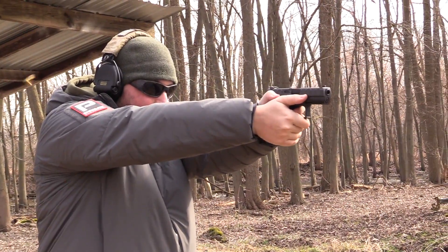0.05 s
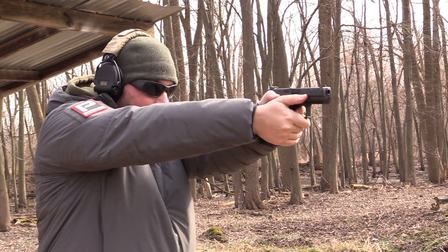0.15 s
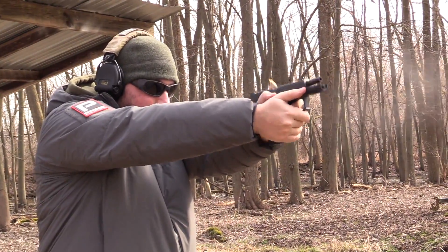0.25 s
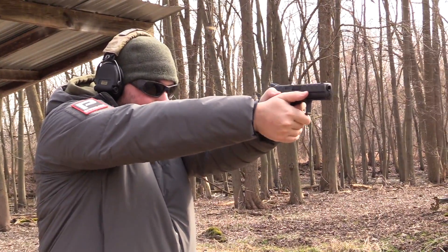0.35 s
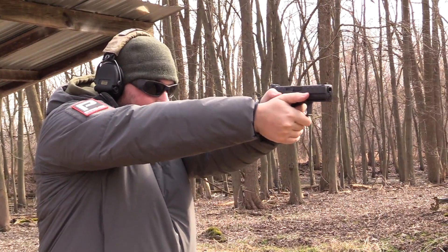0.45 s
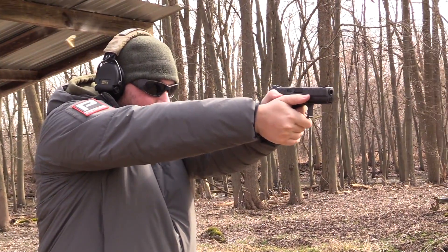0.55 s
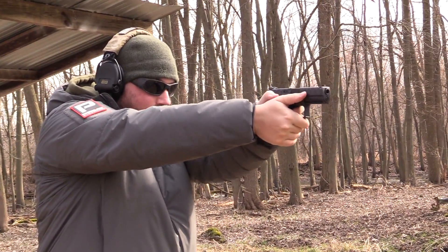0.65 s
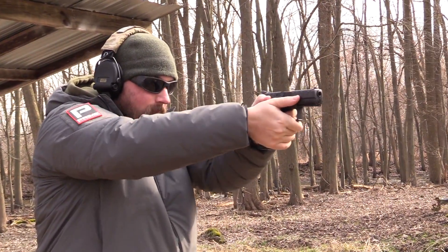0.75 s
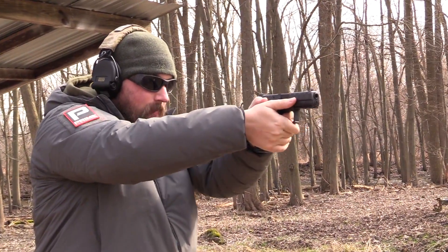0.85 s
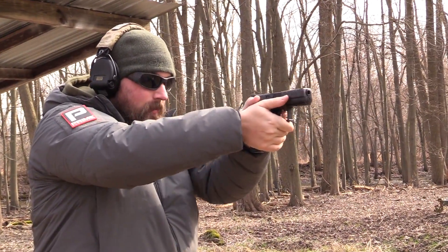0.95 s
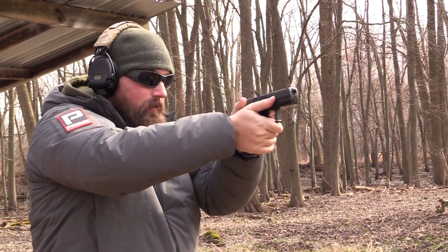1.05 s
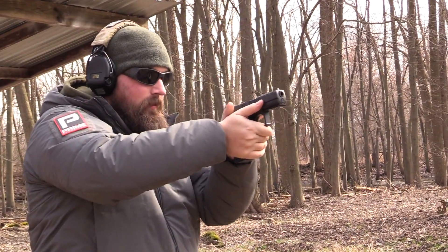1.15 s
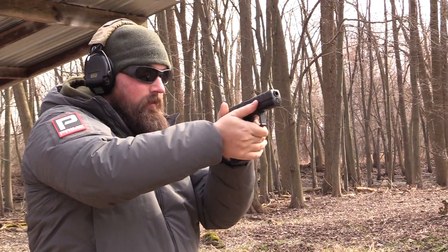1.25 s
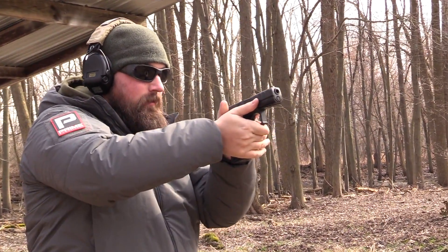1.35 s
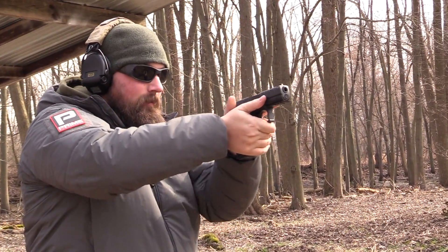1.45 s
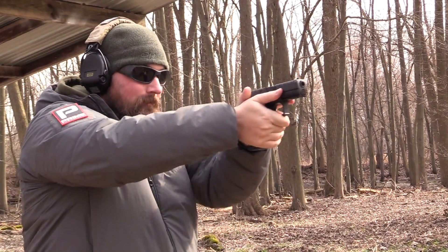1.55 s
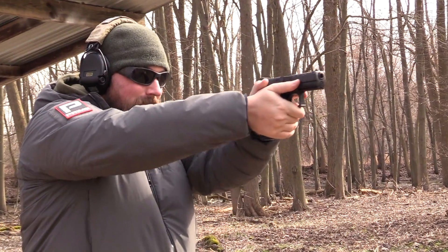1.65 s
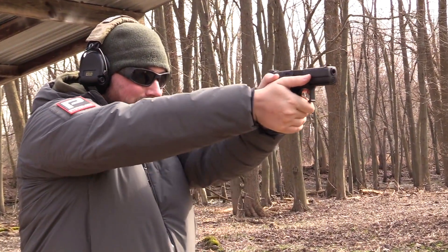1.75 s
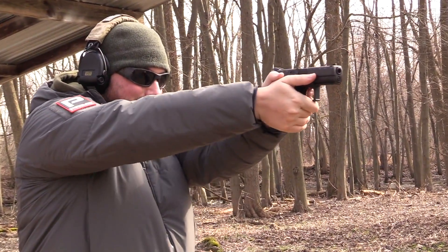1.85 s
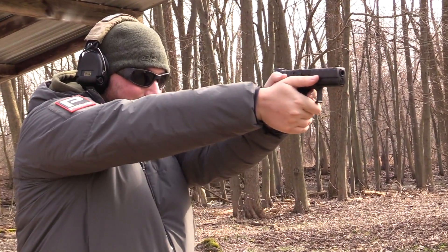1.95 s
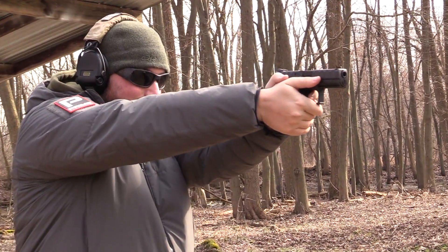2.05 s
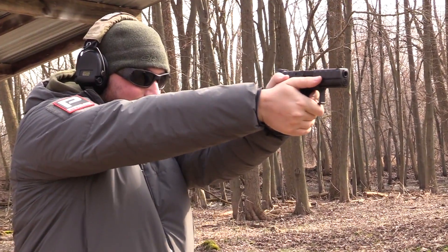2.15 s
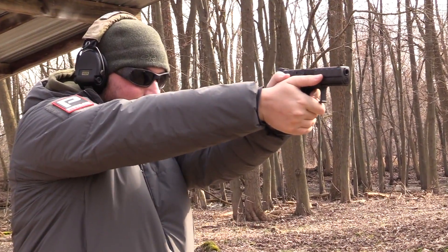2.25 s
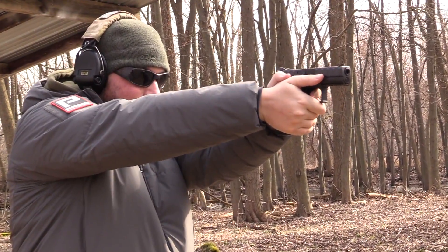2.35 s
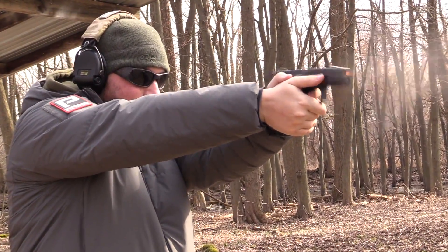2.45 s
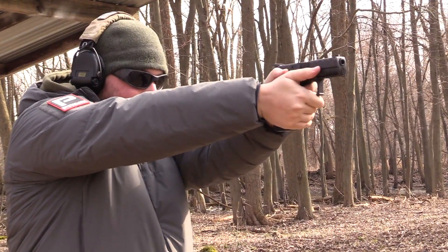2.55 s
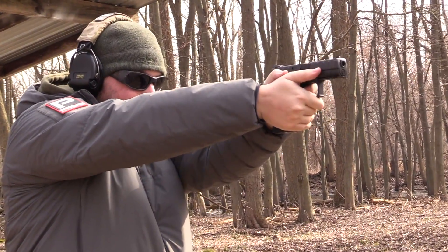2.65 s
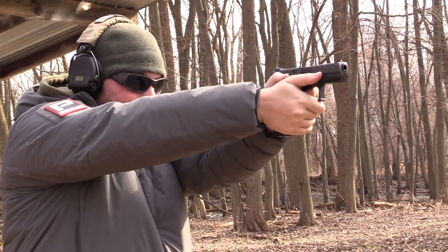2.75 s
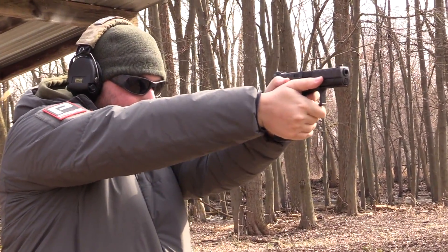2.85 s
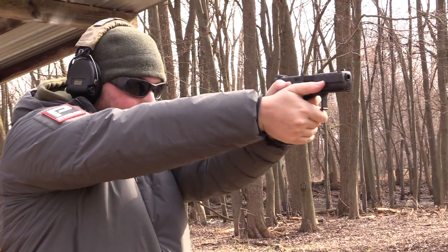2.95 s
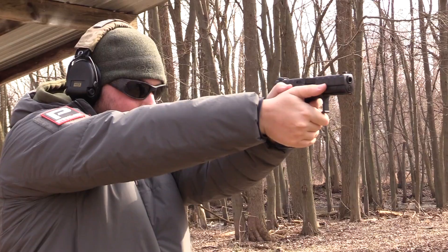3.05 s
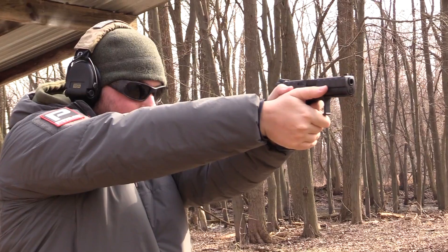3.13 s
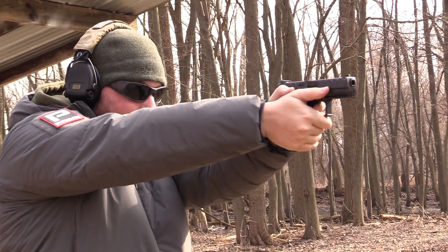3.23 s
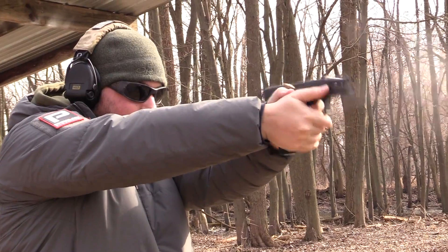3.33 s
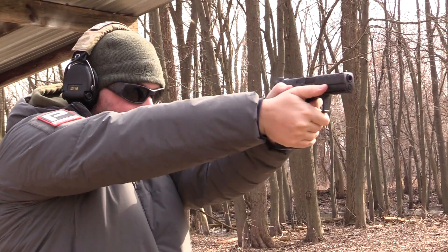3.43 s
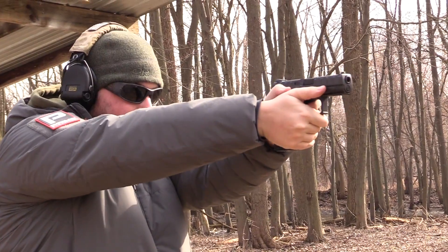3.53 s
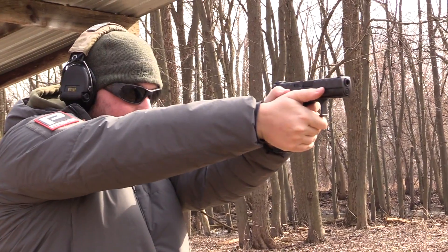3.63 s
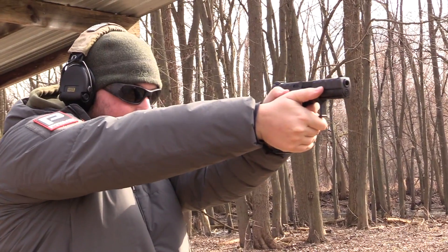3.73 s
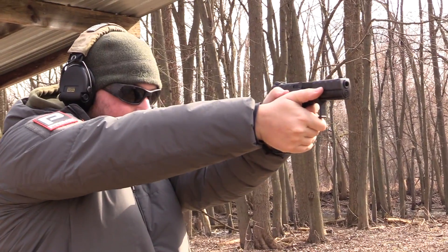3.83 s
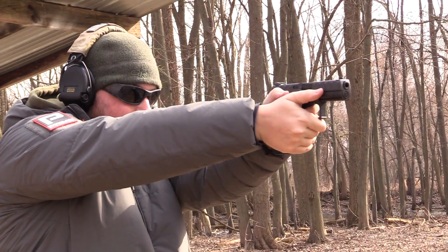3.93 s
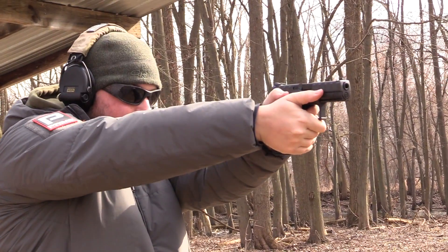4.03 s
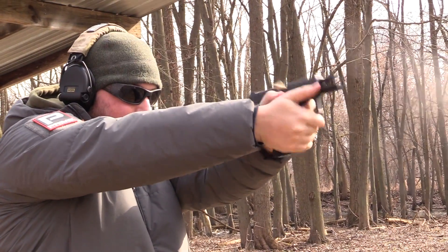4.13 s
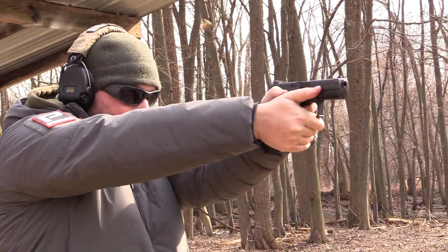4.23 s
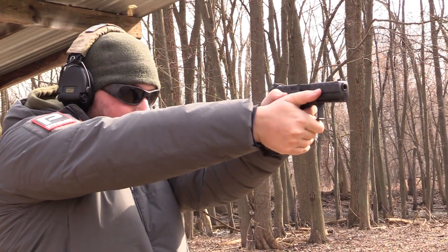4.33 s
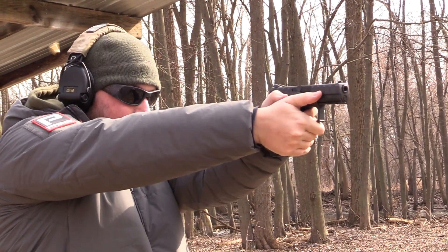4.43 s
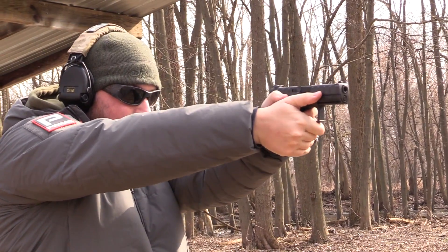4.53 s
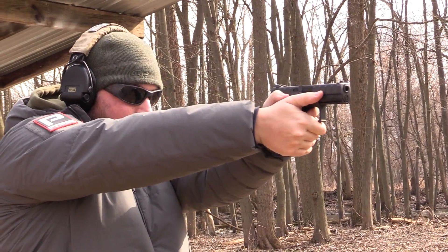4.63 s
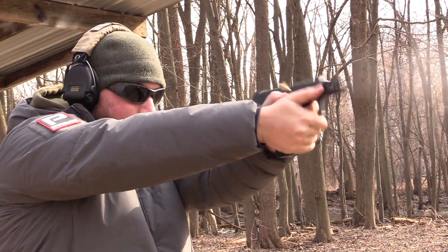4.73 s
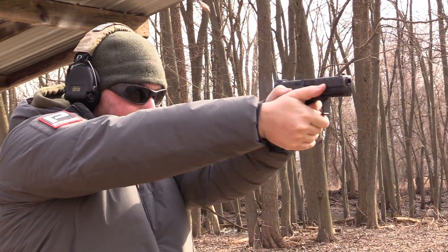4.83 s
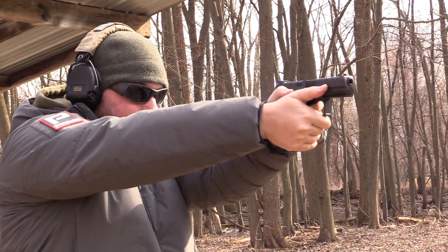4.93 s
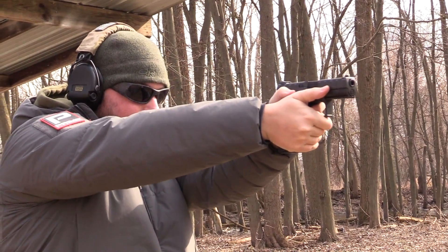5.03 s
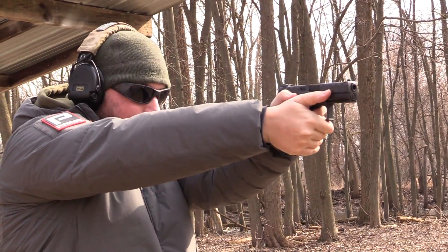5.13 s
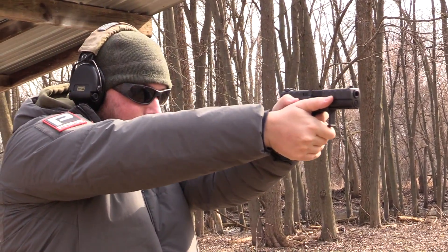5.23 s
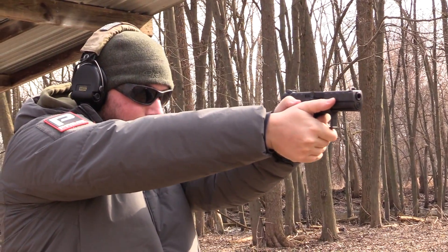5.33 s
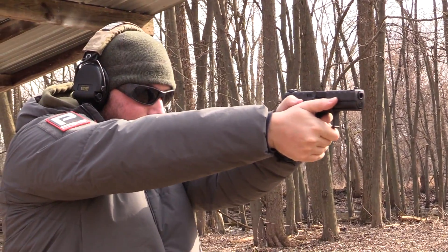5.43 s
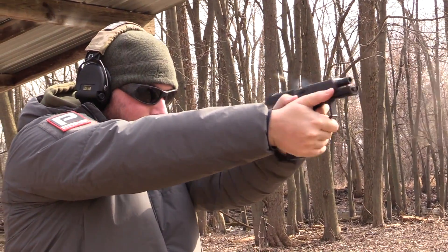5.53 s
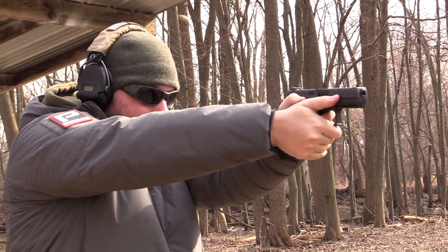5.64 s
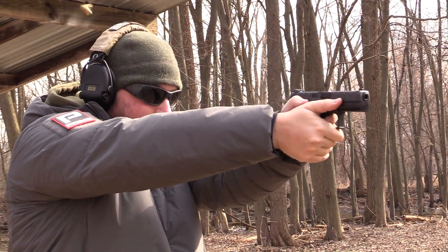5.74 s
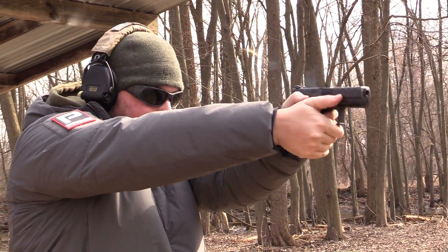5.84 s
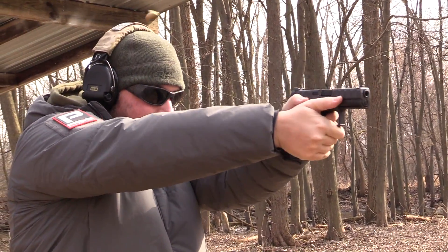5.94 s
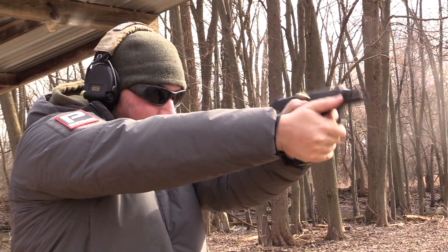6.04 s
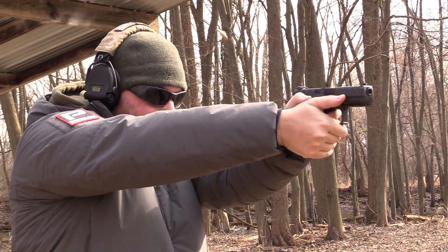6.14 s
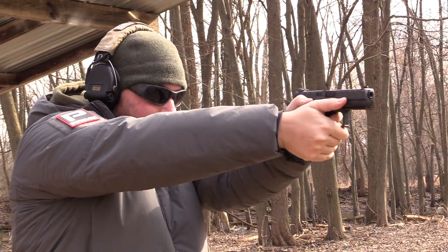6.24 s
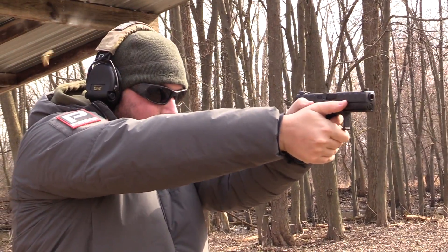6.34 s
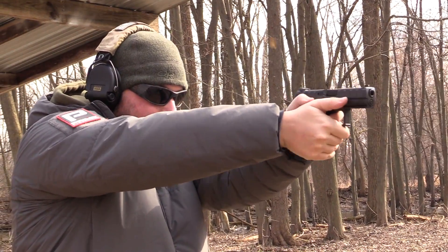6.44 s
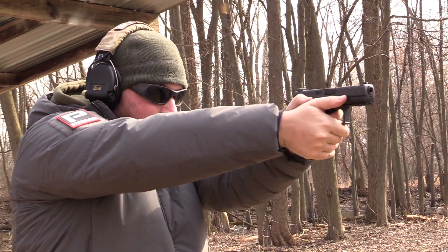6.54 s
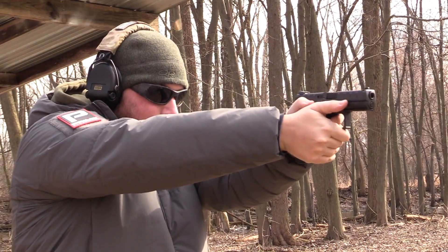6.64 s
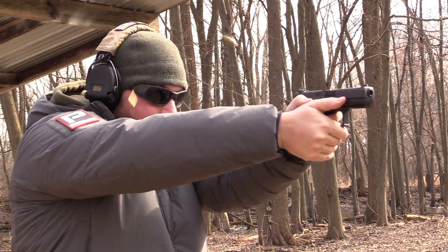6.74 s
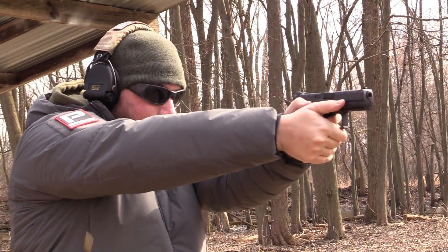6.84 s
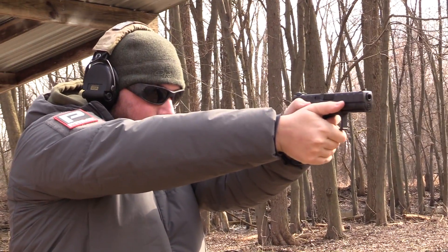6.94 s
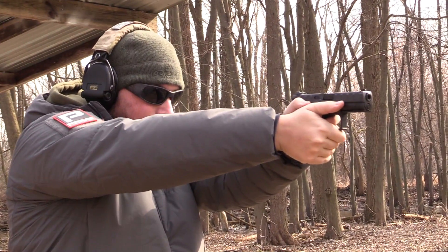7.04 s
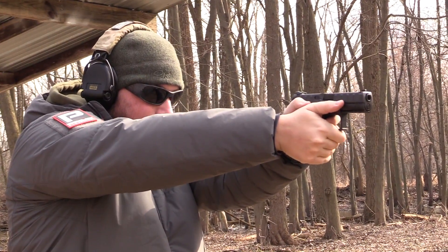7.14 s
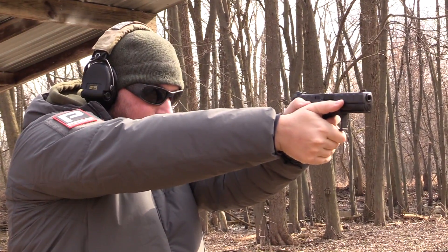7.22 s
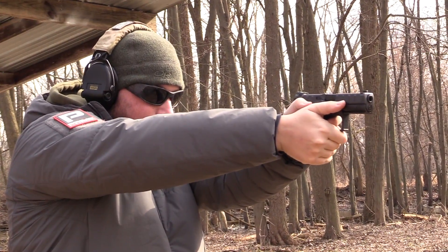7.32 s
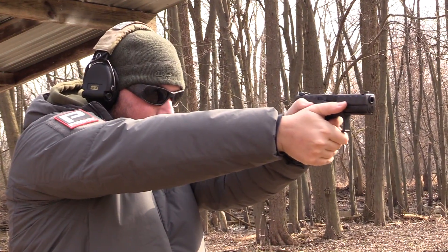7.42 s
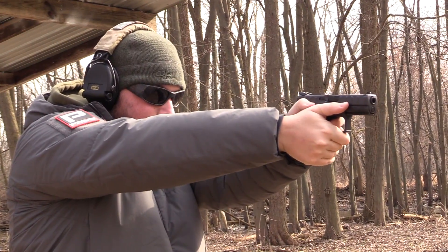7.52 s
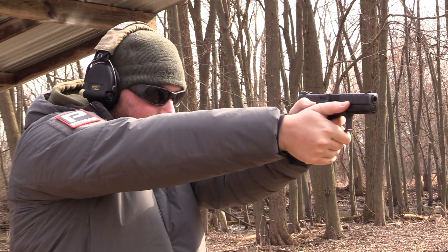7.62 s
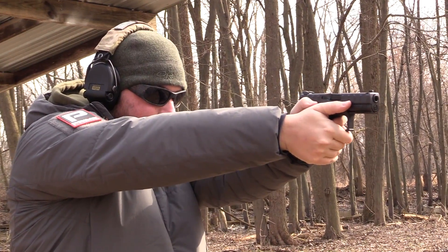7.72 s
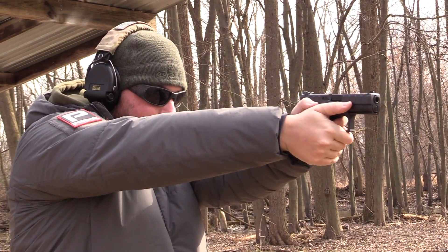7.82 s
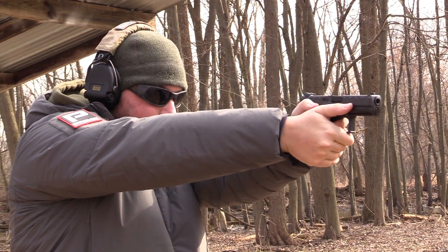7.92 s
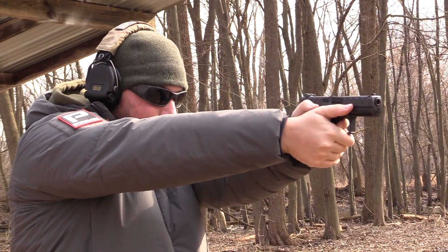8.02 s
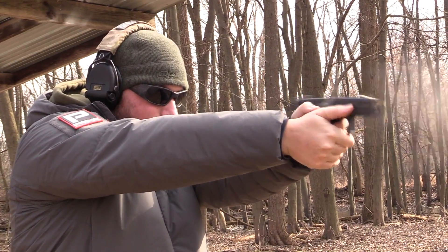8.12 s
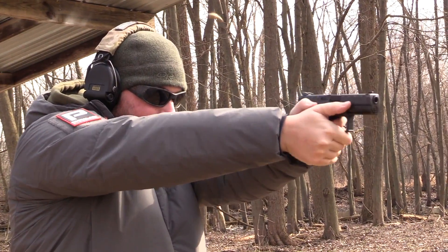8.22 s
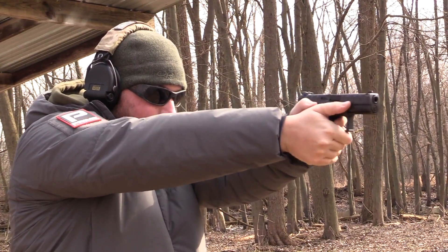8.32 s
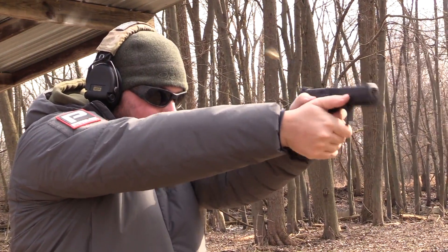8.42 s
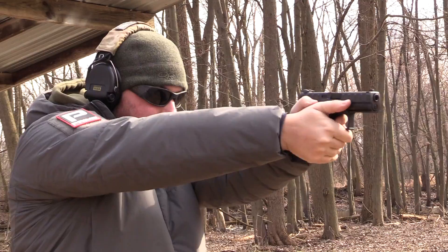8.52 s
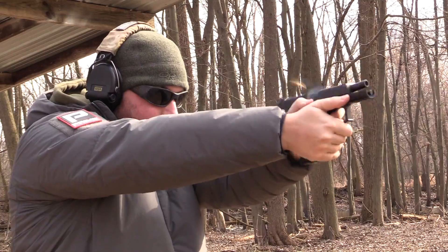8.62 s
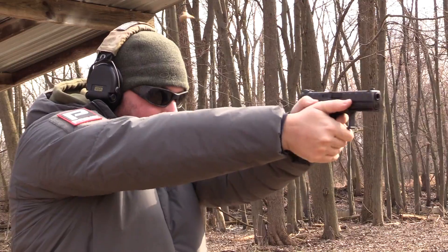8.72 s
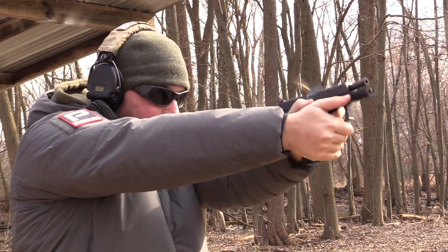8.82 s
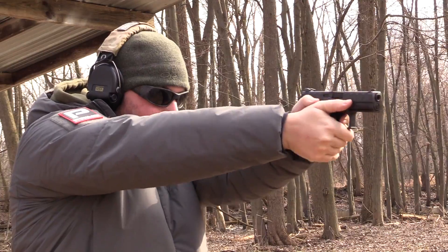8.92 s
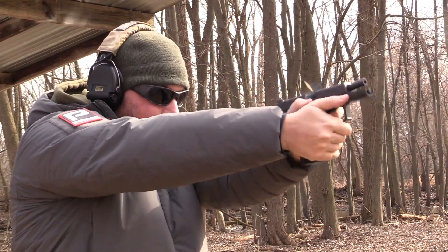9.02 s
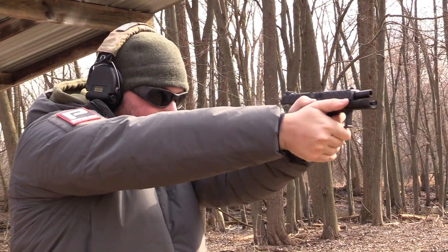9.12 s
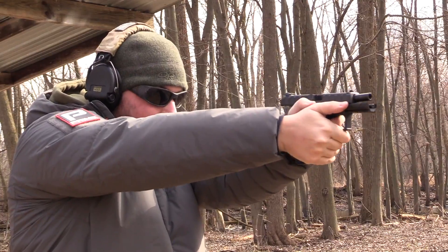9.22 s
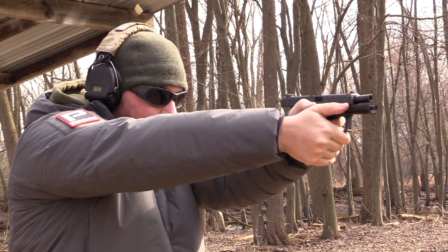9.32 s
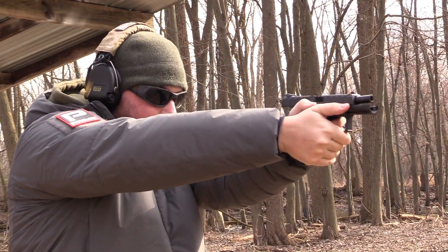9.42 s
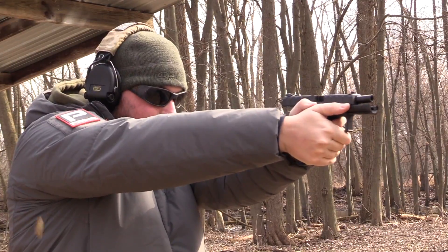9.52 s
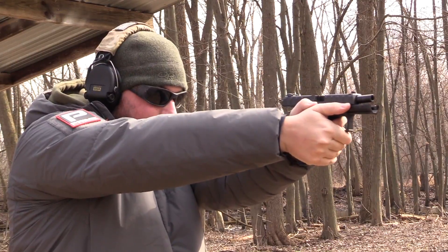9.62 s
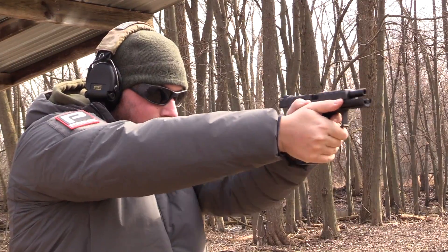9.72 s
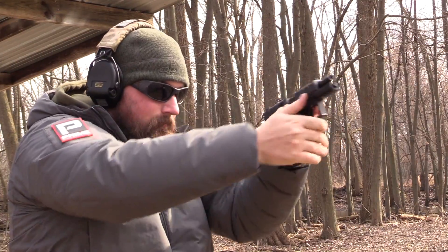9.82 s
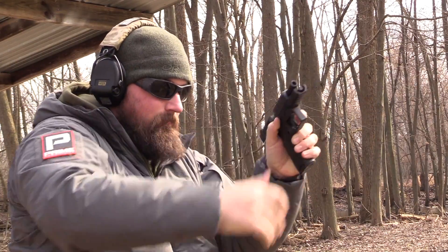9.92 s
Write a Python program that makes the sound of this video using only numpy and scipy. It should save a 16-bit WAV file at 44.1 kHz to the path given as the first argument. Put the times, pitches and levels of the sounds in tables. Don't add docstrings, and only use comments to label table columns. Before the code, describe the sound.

A semi-automatic pistol fired fifteen times, about two metres from a camera microphone outdoors. Dry, flat, distorted cracks with short slaps from roof and trunks. The shots after long gaps hit loudest and most clipped; those in quick strings are tighter. Between them the automatic gain reopens on woodland echo, low wind and hiss, with trigger ticks, wooden knocks and thin brass rings.

```python
import sys
import numpy as np
from scipy import signal
from scipy.fft import rfft, irfft, next_fast_len
from scipy.io import wavfile
from scipy.ndimage import uniform_filter1d

SR = 44100
rng = np.random.default_rng(int(sys.argv[2]) if len(sys.argv) > 2 else 0)


def ratio_of_db(decibels):
    return 10 ** (np.asarray(decibels, float) / 20)


def wav_record(signal):
    frames = np.transpose(np.atleast_2d(signal))
    bounded = np.clip(frames, -1, 1)
    quanta = np.round(bounded * 32767).astype(np.int16)
    wavfile.write(sys.argv[1], SR, quanta)


N = 439677

# start_s, gain_still_open_db, crack_db (ahead of the blast), slap_echo_db, crack_hz
SHOTS = [(0.339, 3, -14, 2, 4320), (2.5595, 18.5, -14.5, -2.5, 4254), (3.4377, 10.5, -18.5, -1, 5000),
         (4.2317, 9.5, -17.5, 0.5, 9760), (4.8349, 6, -18, 0, 4300), (5.6157, 8, -8, -4, 4810),
         (5.878, 1.5, -25, 3, 5000), (6.13698, 1.5, -27, -7, 4580), (6.46601, 3, -18, 1.5, 5000),
         (6.7744, 1.2, -22.5, 1, 4500), (8.232, 16.5, -21, -2.5, 5000), (8.4784, 0.5, -32, 0, 5000),
         (8.7076, 1.5, -24, -4, 4630), (8.9147, 1, -21.5, 0.5, 5000), (9.1149, 0.5, -26.5, -0.5, 5000)]
# delay_ms, size, swing_hz, fade_ms
BLAST_PATHS = [
    (-.33, 7.3, 700, .79),
    (1.21, -2.0, 730, 1.0),
    (2.0, .91, 400, 1.4),
    (2.82, .39, 1140, 2.4),
    (3.87, .65, 460, 2.0),
    (4.51, 1.37, 840, .56),
    (4.5, -.8, 340, 2.14),
    (8.22, .18, 820, 1.15),
]
# delay_ms, level_db, swing_hz, fade_ms, bright_edge_db
SLAP_ECHOES = [
    (17.3, -28, 1100, .8, -20),
    (24.5, -33, 1000, .8, -14),
    (49.2, -21, 800, 1.2, -23),
    (77.5, -33, 700, 1.2, -30),
]
# centre_hz, shelter_db, shelter_t60_s, trunks_db, trunks_t60_s
SCATTERED_RETURN = [(348, -30, .12, -58.5, .5), (735, -25, 0.13, -61.5, .5),
                    (1415, -31, 0.085, -59.5, 0.93), (2800, -48, 0.13, -57, .9),
                    (5000, -44, 0.1, -58.5, 0.79), (8000, -41, 0.0956, -54, 0.85),
                    (12500, -40.5, .09, -60, 0.465)]
# start_s, peak_db, centre_hz, fade_ms
TICKS = [(.249, -54, 11000, 3), (.932, -52, 6000, 3), (1.02, -32.5, 11100, 3), (1.12, -34, 8000, 4.4),
         (2.509, -32, 9000, 1.5), (2.52, -31.5, 9500, 1.5), (3.343, -38, 11500, 3.6),
         (3.368, -23.5, 9000, 7), (3.373, -24.5, 5460, 5.1), (3.402, -45, 6500, 4), (3.384, -45, 4500, 30),
         (3.415, -42, 9000, 4), (3.428, -47, 7000, 3), (1.126, -43, 5000, 8), (7.600, -43, 6000, 12),
         (4.142, -37.5, 11000, 2.5), (4.193, -52, 9000, 2), (4.741, -48, 11000, 2.7),
         (5.498, -38, 10560, 3.2), (5.577, -42, 9320, 1.45), (7.573, -31.5, 8000, 2.5),
         (7.591, -32, 8000, 2), (8.095, -19.5, 9900, 3.3), (8.181, -34.5, 8500, 2),
         (8.189, -36.5, 9000, 1.8), (9.525, -44, 8450, 2.8), (9.577, -51, 10500, 2.2),
         (9.807, -39, 6500, 1.4), (9.816, -44, 7500, 6.1), (9.950, -21.5, 9400, 5.4)]
# start_s, peak_db, ring_hz, ring_db (over the tick), upper_ring_db
BRASS_CASES = [(1.137, -30.5, 10830, -14, -30), (3.382, -43, 11250, -0.5, -1.5),
               (3.383, -52, 11133, 6, -31), (3.386, -61, 10374, 9, -29), (4.62, -76, 11600, 4.5, -31),
               (7.263, -44.5, 10260, -2, -27), (7.268, -52, 10940, -1, -30), (7.399, -65, 10530, 5.5, -30),
               (7.421, -54.5, 10500, -5, -1), (7.576, -45, 10520, -1, -32), (7.596, -37, 10300, -3, -27),
               (7.967, -43, 10330, 0, -22), (9.526, -48, 10900, -20, -3), (9.585, -82, 10400, 4, -30),
               (9.68, -74.5, 10300, -6, 11), (9.70, -61, 11750, 5, -12), (9.70, -66, 10310, 7, -33)]
# start_s, level_db, pitch_hz, t60_s
KNOCKS = [(1.12, -35.5, 1755, 0.14), (1.12, -37, 2470, 0.066), (1.119, -48, 5570, .08),
          (1.136, -48, 4240, 0.11), (3.371, -20, 1252, 0.058), (3.369, -40, 3600, 0.048),
          (7.573, -32, 4960, 0.023), (7.572, -32, 6200, 0.032), (8.095, -34, 8800, 0.033),
          (8.096, -36, 3600, .03), (9.949, -35, 2460, 0.04), (9.949, -44.5, 4300, 0.05),
          (9.95, -29.5, 5730, 0.025)]
# start_s, gain_still_open_db
EARLIER_SHOT = (-0.2, 8.3)
# since_shot_s, gain_db
GAIN_REOPENING = [(0, -38.5), (.2, -35), (.45, -28), (.65, -21), (.86, -13), (1.2, -4.5), (1.42, -0.5)]
# pitch_hz, level_db (per Hz)
WOODS_COLOUR = [(88, -49.5), (130, -21), (228, -17), (335, -0.5), (650, -5), (780, -2), (1160, -7.5),
                (1400, -14.5), (2150, -20), (2700, -32), (4200, -45.5), (6000, -69.5)]
WIND_COLOUR = [(12, -33.5), (20, -14), (38, -5), (80, 0), (160, -7.5), (300, -12.5), (600, -26),
               (1500, -56.5)]
TWIGS_COLOUR = [(1500, -8), (2250, 5), (3500, 0), (5000, -6), (7000, -15.5), (10000, -26)]
HISS_COLOUR = [(3500, -19), (5500, -1), (8000, 0), (11000, 0.5), (14000, 0), (16500, -2.5)]
# steady_db, echo_db, echo_fade_db_per_s, dulled_db_per_db_open, gain_swing_share
WOODS_LAW = (-41.5, -5, 21, -0.0665, 1.0087)
WIND_LAW = (-35, -32, 27.5, -0.2, 1.01)
TWIGS_LAW = (-63, -20, 32.5, 0.04, 1.02)
HISS_LAW = (-64.5, -32.5, 95, 0.4, 0.87)
# start_s, level_db
GUSTS = [(0, -2), (1.0, 1.3), (1.85, 1.5), (2.2, 2), (2.5, 3), (3.1, -1.54), (3.36, 5.5), (3.9, -1.7),
         (4.2, 1), (5.5, 2), (6.2, -0.8), (7.5, 4.5), (8.1, 5), (9.0, -1.2), (9.97, 2)]

LEAD = 176
DEEPER, DEEPER_TOP_DB = 0.6, 10.5
TREELINE_S, GAP_DB = 0.064, -7.5
BRASS_T60_S, UPPER_RING_HZ = 0.21, 15440
TOP_HZ = 15800


def swing(ms, hz, fade_ms):
    ms = np.maximum(ms, 0)
    return np.exp(-ms / fade_ms) * np.sin(2 * np.pi * hz * ms / 1000)


def band(hz, octaves, size):
    edges = np.clip([hz * 2 ** (-octaves / 2), hz * 2 ** (octaves / 2)], 20, 0.49 * SR)
    sos = signal.butter(2, edges, "bandpass", fs=SR, output="sos")
    x = signal.sosfilt(sos, rng.standard_normal(size))
    return x / x.std()


def add(out, start_s, x):
    i = int(round(start_s * SR))
    out[i:i + len(x)] += x[:len(out) - i]


def muzzle_blast(ms):
    paths = sum(size * swing(ms - delay, hz, fade) for delay, size, hz, fade in BLAST_PATHS)
    return (ms >= 0) * paths


def blast_grit(ms):
    return ratio_of_db(-20.5) * band(11000, 1.8, len(ms)) * np.exp(-abs(ms) / 4.7) * (ms >= 0)


def crack(ms, db, hz):
    rise = np.clip(1 + ms / 2.4, 0, 1) ** 1.7 * (ms < 0.1)
    noise = band(hz, 0.24, len(ms)) + 1.5 * band(5000, 1.9, len(ms))
    return ratio_of_db(db) * noise * rise


def slap_echoes(ms, slap_db):
    out = np.zeros(len(ms))
    for delay, db, hz, fade, edge_db in SLAP_ECHOES:
        edge = ratio_of_db(edge_db) * band(5000, 1.7, len(ms)) * np.exp(-abs(ms - delay - 1.2) / 1.1)
        out += ratio_of_db(db + slap_db) * (edge - swing(ms - delay, hz, fade))
    return out


def scatter(size):
    t = np.arange(size) / SR
    gate = np.clip((t - 0.004) / 0.0059, 0, 1) * np.clip(4 - 4 * t / t[-1], 0, 1)
    gate = gate * ratio_of_db(2.0 * band(83, 2.5, size))
    wash = np.zeros(size)
    for hz, near_db, near_t60, far_db, far_t60 in SCATTERED_RETURN:
        fades = ratio_of_db(near_db - 60 * t / near_t60) + ratio_of_db(far_db - 60 * t / far_t60)
        wash += band(hz, 1.0, size) * fades
    return gate * wash


def shots():
    out = np.zeros(N)
    ms = (np.arange(int(0.1 * SR)) - LEAD) * 1000 / SR
    blast = muzzle_blast(ms)
    still_open = 1 / (1 + np.exp((ms - 8.45) / 0.7))
    size = SR // 2
    shutting = np.clip(np.arange(size) / SR / 0.04, 0, 1)
    same = scatter(size)
    for start_s, open_db, crack_db, slap_db, crack_hz in SHOTS:
        direct = blast + blast_grit(ms) + crack(ms, crack_db, crack_hz)
        x = direct * ratio_of_db(open_db * still_open)
        x = x - 0.165 * (ratio_of_db(open_db) - 1) * swing(ms - 5.1, 65, 4.7)
        x = x - ratio_of_db(-26.0) * swing(ms - 6.5, 28, 14.0)
        add(out, start_s - LEAD / SR, x + slap_echoes(ms, slap_db))
        shut = ratio_of_db(-0.3 * min(open_db, DEEPER_TOP_DB) * shutting)
        add(out, start_s, shut * (0.52 * same + 0.52 * scatter(size)))
    return out


def ticks():
    out, ms = np.zeros(N), np.arange(2000) * 1000 / SR
    for start_s, db, hz, fade_ms in TICKS:
        add(out, start_s, ratio_of_db(db - 6.5) * band(hz, 1.6, 2000) * np.exp(-ms / max(fade_ms, 0.3)))
    return out


def brass_cases():
    out, t = np.zeros(N), np.arange(SR // 3) / SR
    for start_s, db, hz, ring_db, upper_db in BRASS_CASES:
        tumble = 1 + 0.5 * band(60, 2.2, len(t))
        upper = ratio_of_db(upper_db) * band(UPPER_RING_HZ, 0.015, len(t))
        ring = np.sin(2 * np.pi * hz * t) * tumble + upper
        add(out, start_s, ratio_of_db(db + ring_db - 60 * t / BRASS_T60_S) * ring)
        tick_fade = ratio_of_db(db - 1.5 - 60 * t / 0.015) + ratio_of_db(db - 19.5 - 60 * t / 0.25)
        add(out, start_s, band(8500, 3.3, len(t)) * tick_fade)
    return out


def knocks():
    out, t = np.zeros(N), np.arange(SR // 3) / SR
    for start_s, db, hz, t60 in KNOCKS:
        tone = np.sin(2 * np.pi * hz * t) + 0.76 * band(hz, 0.32, len(t))
        add(out, start_s, ratio_of_db(db - 60 * t / t60) * np.clip(t / 0.0026, 0, 1) * tone)
    return out


def walk(rate):
    k = int(SR / rate)
    held = np.repeat(rng.standard_normal(N // k + 1), k)
    return 1.2 * uniform_filter1d(held, k)[:N]


def coloured(table, lo_hz, hi_hz, flicker_db, rate):
    size = next_fast_len(N)
    f = np.maximum(np.arange(size // 2 + 1) * SR / size, 1)
    hz, db = np.transpose(table)
    colour = ratio_of_db(np.interp(np.log(f), np.log(hz), db, -99, -99))
    spec = rfft(rng.standard_normal(size)) * colour
    inside = (f > lo_hz) & (f < hi_hz)
    spec = spec * size / np.sqrt(2 * np.sum(abs(spec[inside]) ** 2))
    octave = np.floor(np.log2(f))
    out = np.zeros(N)
    for k in range(int(np.log2(hz[0])), int(np.log2(hz[-1])) + 1):
        out += irfft(spec * (octave == k), size)[:N] * ratio_of_db(flicker_db * walk(rate))
    return out


def lulls():
    t = np.arange(0, N + 64, 64) / SR
    sample_s = np.arange(N) / SR
    fired, open_db = np.transpose([EARLIER_SHOT] + [row[:2] for row in SHOTS])
    fired = fired + 0.009
    open_db = np.minimum(open_db, DEEPER_TOP_DB)
    last = np.maximum(np.searchsorted(fired, t) - 1, 0)
    reopen_s, reopen_db = np.transpose(GAIN_REOPENING)
    shut_db = np.interp(t - fired[last], reopen_s, reopen_db)
    gain_db = shut_db * (1 - DEEPER * open_db[last] / reopen_db[0])
    since = t - fired[:, None]

    def heard(steady_db, echo_db, fade, dulled, share):
        each = (since > 0) * ratio_of_db(echo_db - fade * np.maximum(since, 0)) ** 2
        echoes = np.sum(each, axis=0) * ratio_of_db(-dulled * open_db[last]) ** 2
        total = np.sqrt(ratio_of_db(steady_db) ** 2 + echoes) * ratio_of_db(share * gain_db)
        return np.interp(sample_s, t, total)

    gust_db = np.interp(t, *np.transpose(GUSTS))
    before_trees = np.clip((TREELINE_S - t + fired[last]) / 0.0056, 0, 1)
    gap_db = np.interp(sample_s, t, GAP_DB * before_trees)
    woods = ratio_of_db(gap_db) * heard(*WOODS_LAW)
    woods = woods * coloured(WOODS_COLOUR, 250, 1800, flicker_db=0.52, rate=20)
    wind = ratio_of_db(2.0) * heard(WIND_LAW[0] + gust_db, *WIND_LAW[1:])
    wind = wind * coloured(WIND_COLOUR, 25.07, 140, flicker_db=1.04, rate=14)
    twigs = ratio_of_db(-1.33) * heard(*TWIGS_LAW)
    twigs = twigs * coloured(TWIGS_COLOUR, 2600, 5000, flicker_db=1.0, rate=14)
    hiss = ratio_of_db(-1.6) * heard(*HISS_LAW)
    hiss = hiss * coloured(HISS_COLOUR, 13640, 15000, flicker_db=0.4, rate=7.6)
    return woods + wind + twigs + hiss


def scene():
    return (shots() + ticks() + brass_cases() + knocks() + lulls())[None]


def roll_off(x):
    return signal.sosfilt(signal.butter(12, 16500, fs=SR, output="sos"), x)


def record(dry):
    top = signal.ellip(8, 0.1, 60, TOP_HZ, fs=SR, output="sos")
    trim = signal.cheby2(10, 25, TOP_HZ + 500, fs=SR, output="sos")
    overloaded = np.clip(signal.sosfiltfilt(top, dry), -1.03, 1.03)
    trimmed = signal.sosfiltfilt(trim, overloaded)
    return roll_off(np.clip(trimmed, -1, 1))


dry = scene()
out = record(dry)
wav_record(out)
```